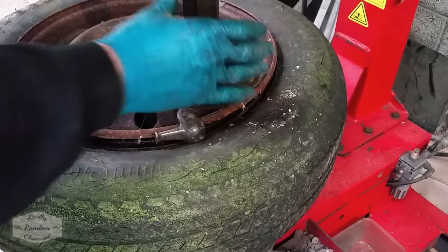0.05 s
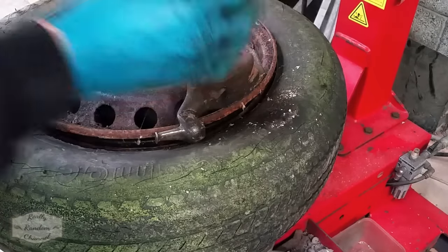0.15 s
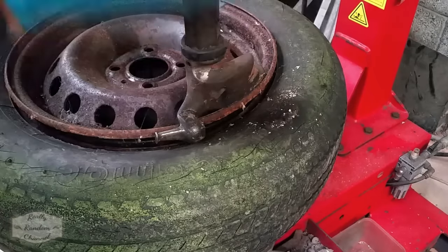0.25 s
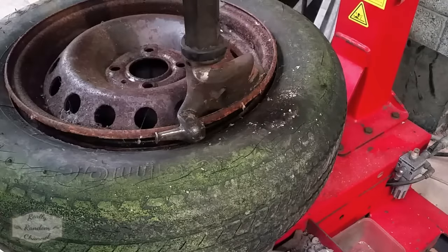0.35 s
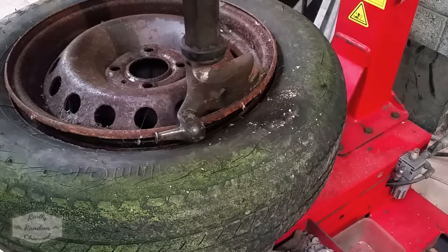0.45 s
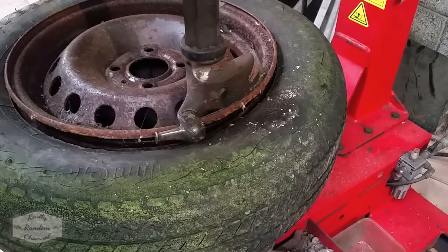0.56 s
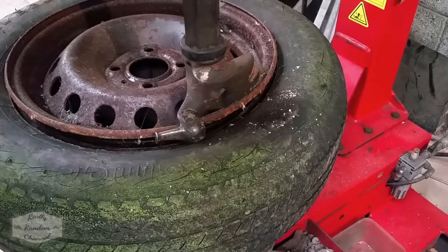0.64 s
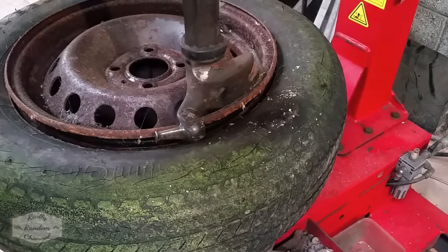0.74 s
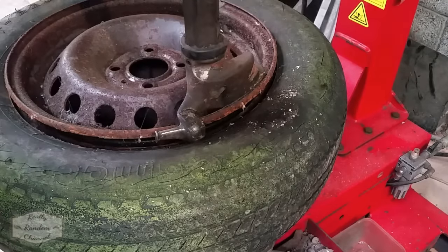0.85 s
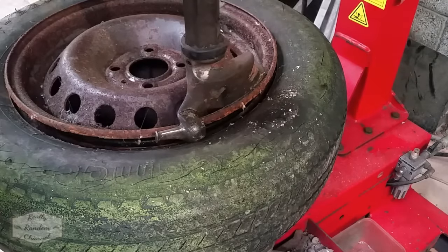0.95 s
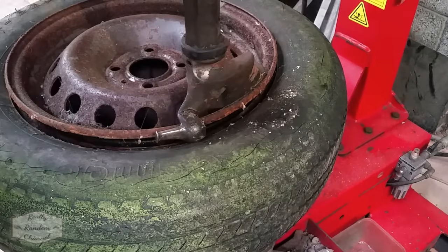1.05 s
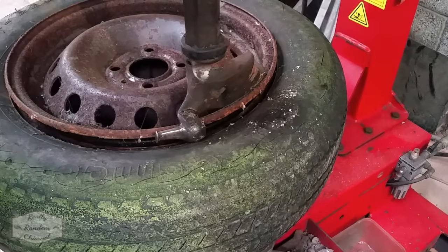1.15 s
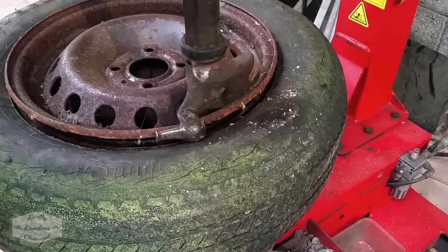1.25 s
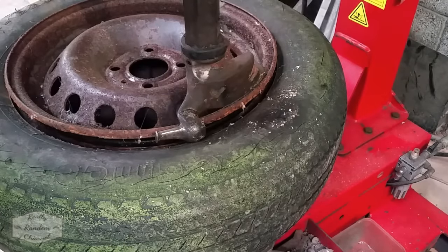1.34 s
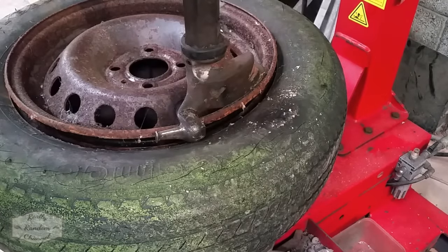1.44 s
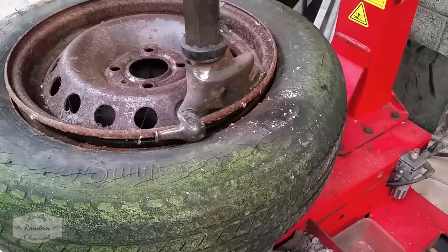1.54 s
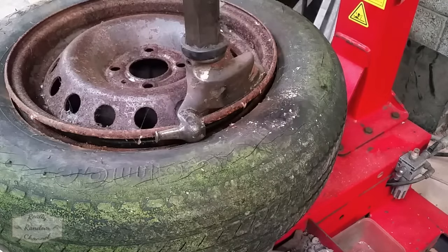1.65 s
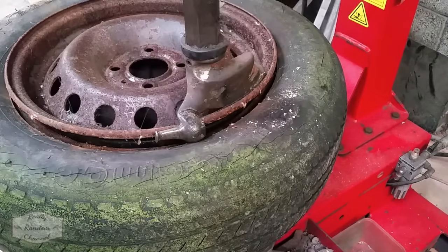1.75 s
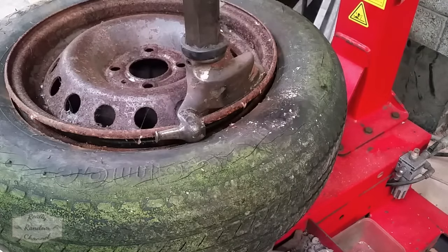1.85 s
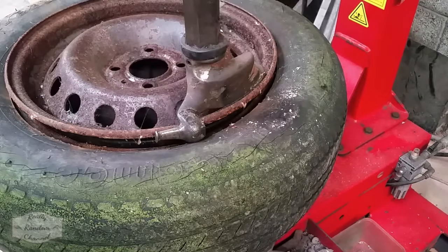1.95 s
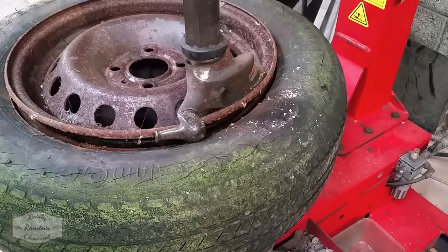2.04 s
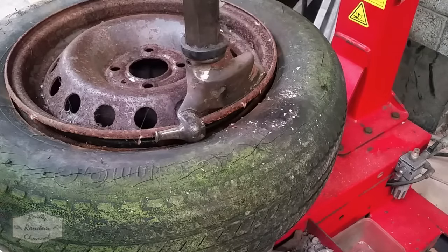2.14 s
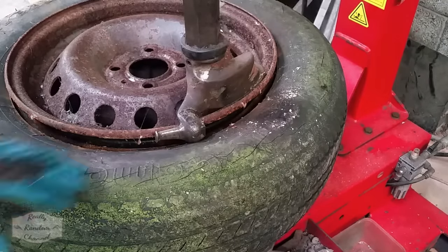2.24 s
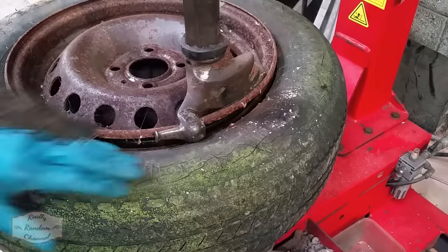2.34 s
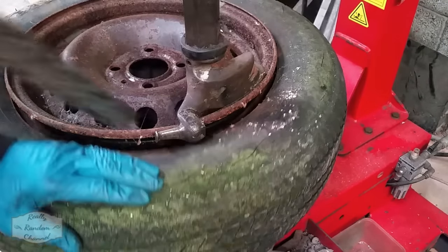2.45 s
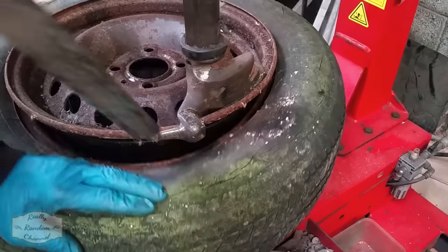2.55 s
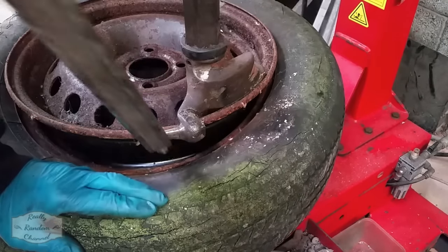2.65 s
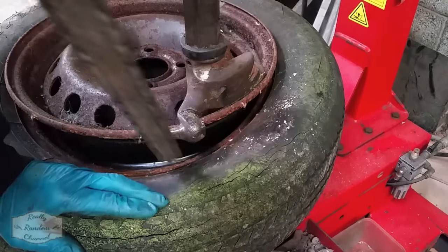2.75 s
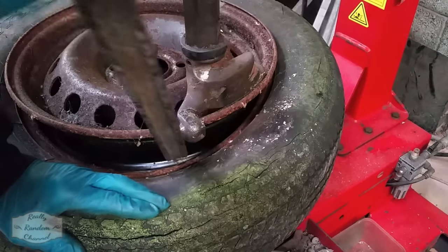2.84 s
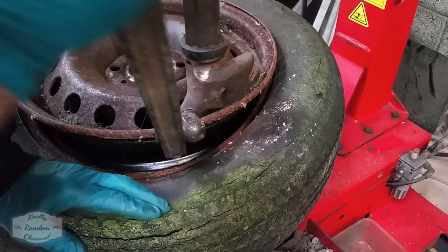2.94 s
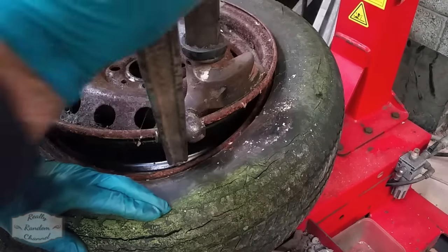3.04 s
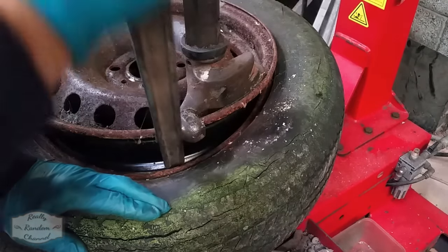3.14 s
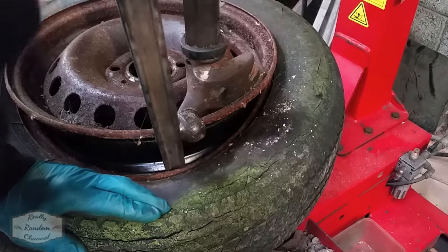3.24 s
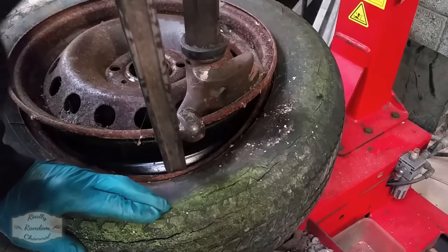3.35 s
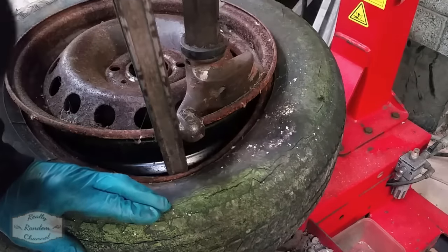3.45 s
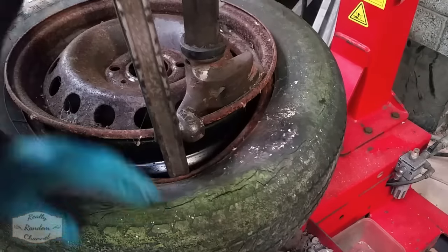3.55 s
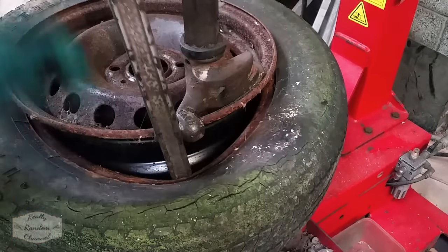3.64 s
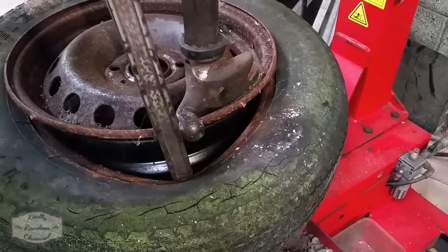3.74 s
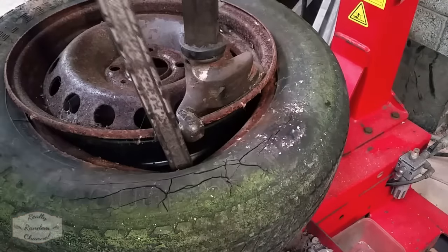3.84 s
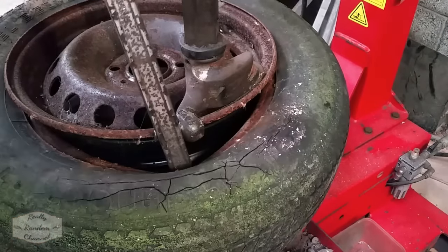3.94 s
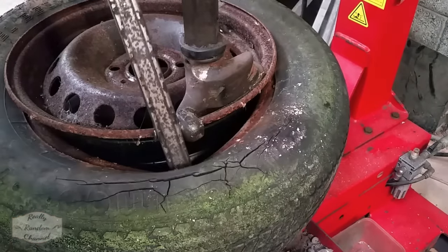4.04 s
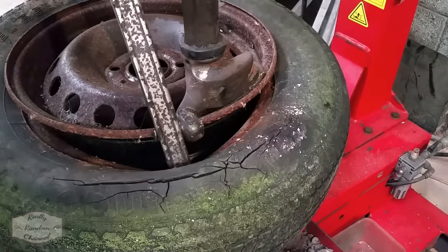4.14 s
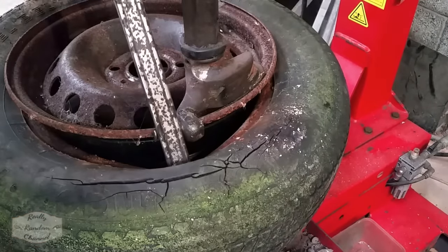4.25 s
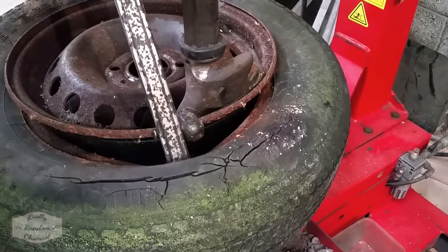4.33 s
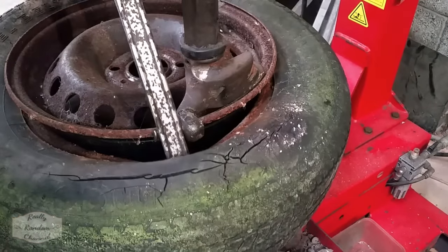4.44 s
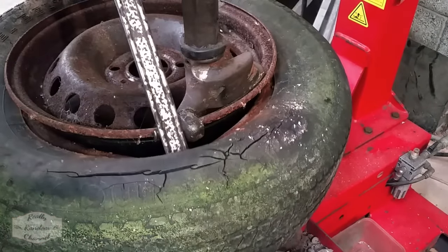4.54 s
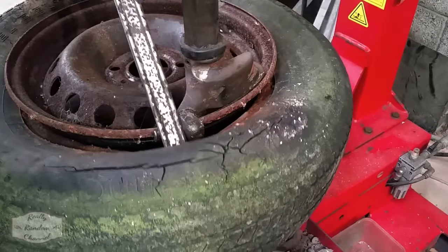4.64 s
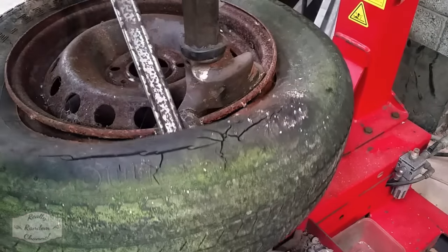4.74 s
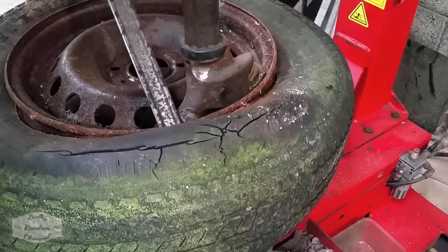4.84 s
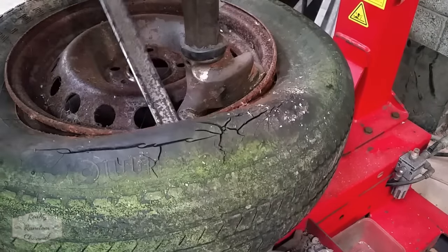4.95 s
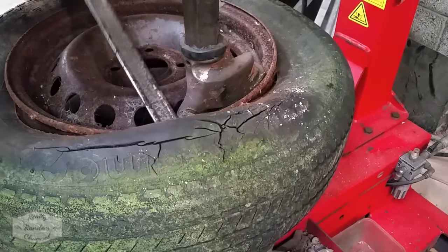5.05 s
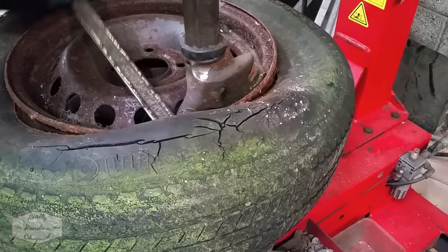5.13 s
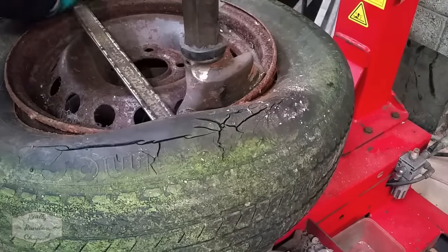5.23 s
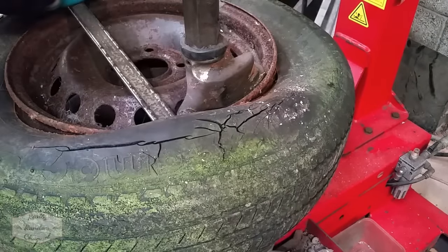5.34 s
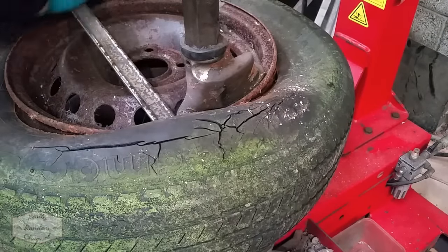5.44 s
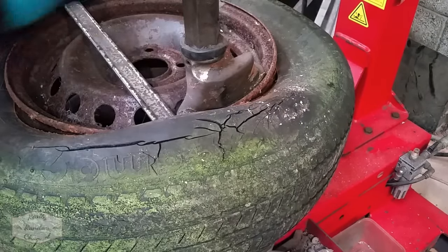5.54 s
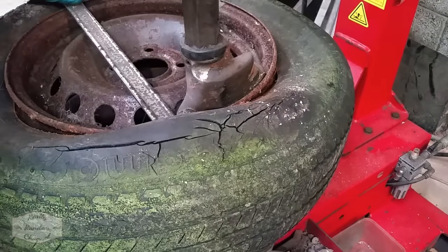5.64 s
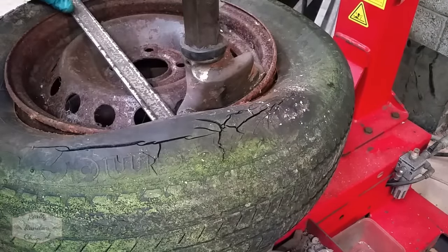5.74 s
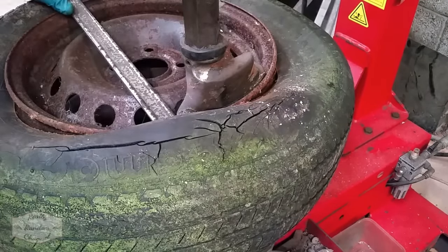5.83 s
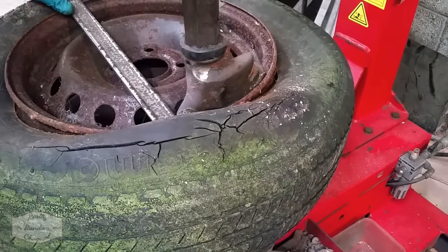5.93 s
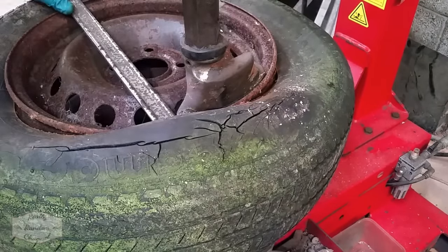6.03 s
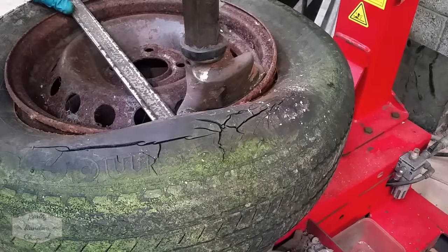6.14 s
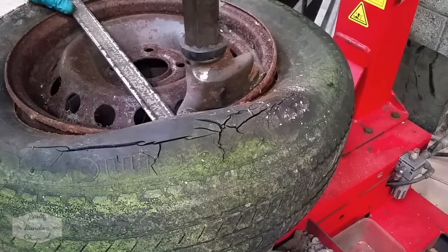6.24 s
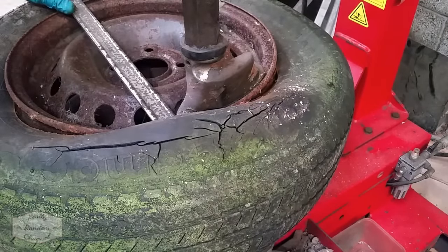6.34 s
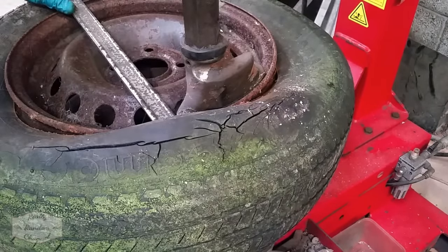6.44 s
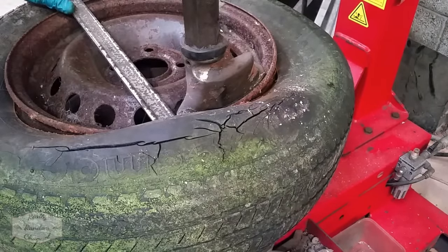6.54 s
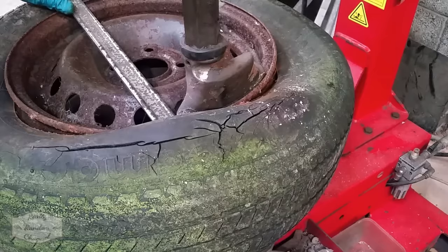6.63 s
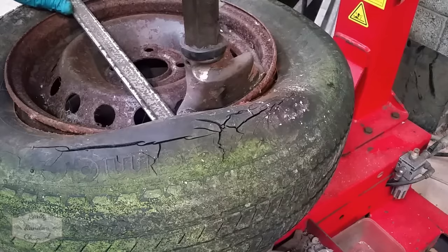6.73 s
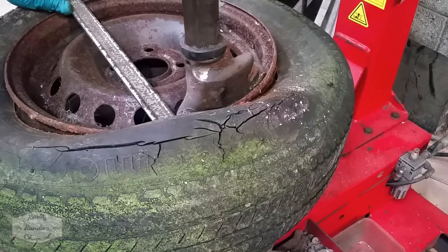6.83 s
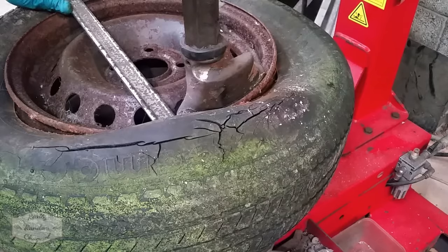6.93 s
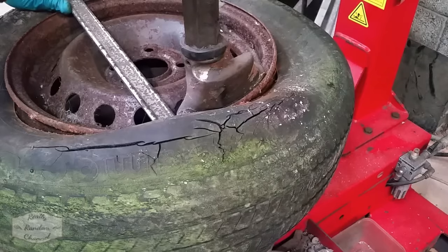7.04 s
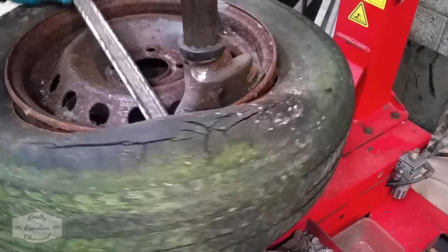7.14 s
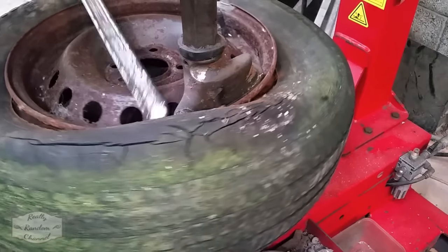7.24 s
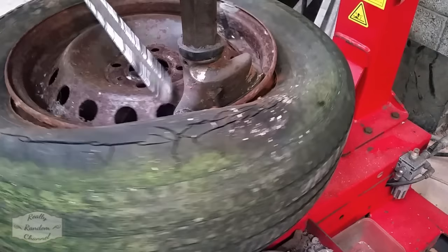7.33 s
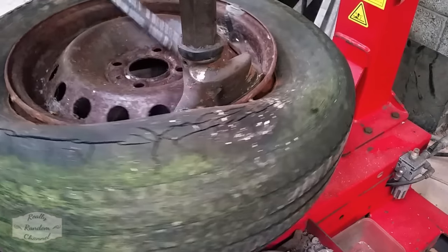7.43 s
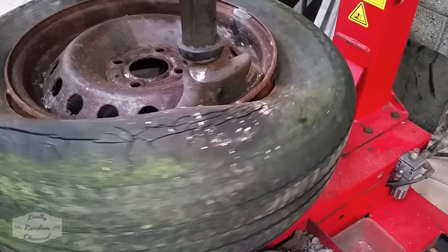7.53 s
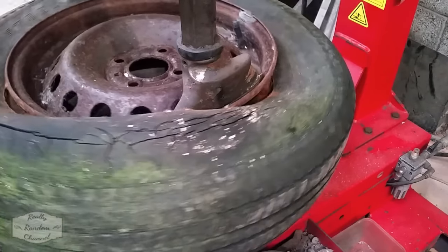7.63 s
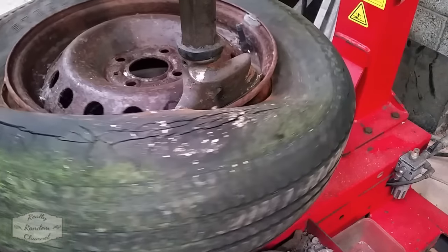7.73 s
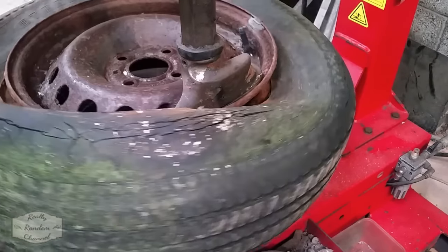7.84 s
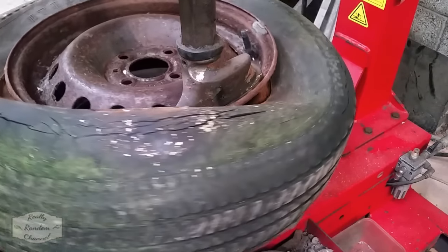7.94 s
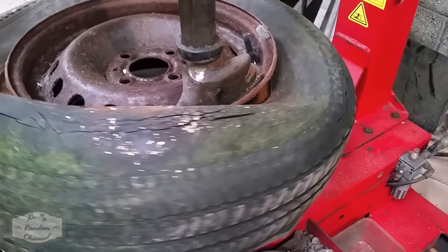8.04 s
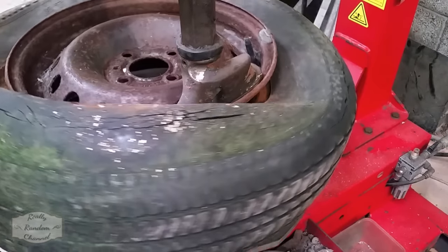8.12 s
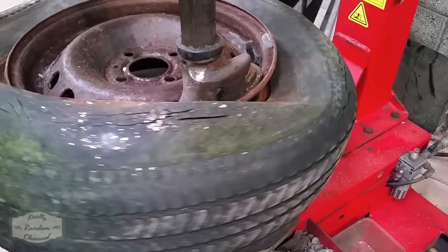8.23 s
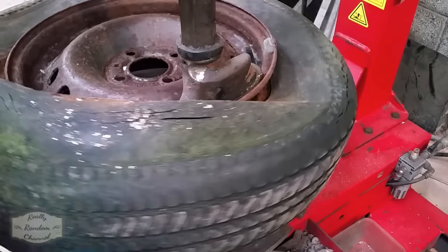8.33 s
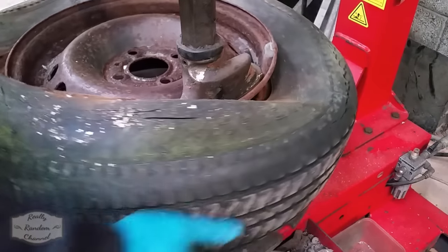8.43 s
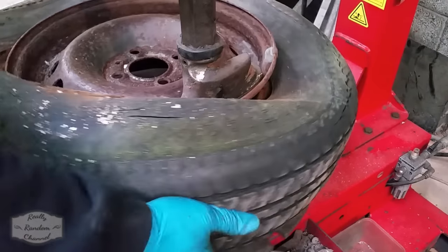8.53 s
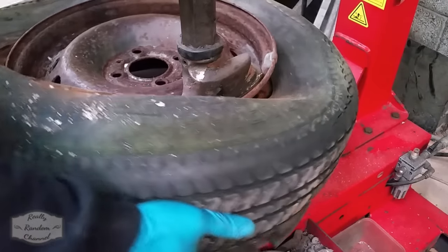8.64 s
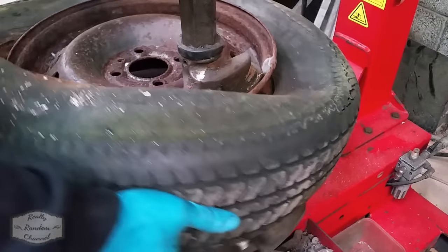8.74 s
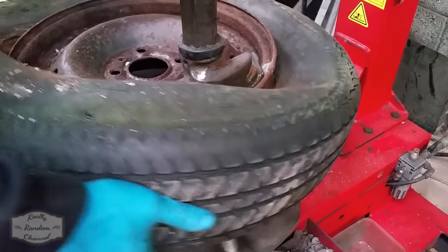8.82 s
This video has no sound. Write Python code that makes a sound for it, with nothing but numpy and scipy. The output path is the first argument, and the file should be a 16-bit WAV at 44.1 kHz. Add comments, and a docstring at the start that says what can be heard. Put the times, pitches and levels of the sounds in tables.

```python
"""In a small workshop a steel lever is pushed under a tyre bead and heaved over a rusty rim.
Over a quiet rumble the rubber groans on resonances shaken by random slips and grains of noise scrape and hiss;
low decaying swings thump and noise bursts knock like steel. Then the turntable motor starts as wavering tones,
the lever springs free and clanks in bending modes, and the bead pops over the rim with a tick of noise.
A near, almost mono microphone pair hears it, with sparse reflections from the room."""
import sys
import numpy as np
from scipy import signal
from scipy.fft import rfft, irfft
from scipy.io import wavfile
from scipy.ndimage import uniform_filter1d

SR = 44100
rng = np.random.default_rng(int(sys.argv[2]) if len(sys.argv) > 2 else 0)


def wav_record(signal):
    """Record a signal, one row per channel, as 16-bit PCM in the file named by sys.argv[1]."""
    frames = np.transpose(np.atleast_2d(signal))
    bounded = np.clip(frames, -1, 1)
    # unit amplitude maps onto the largest positive 16-bit level
    quanta = np.round(bounded * 32767).astype(np.int16)
    wavfile.write(sys.argv[1], SR, quanta)


def gain_from_db(level_db):
    """Convert decibel levels to linear amplitude factors (20 dB per decade)."""
    decades = np.asarray(level_db, float) / 20
    return 10 ** decades


N = 391608  # length in samples

# Spectrum of fine rubber hiss and of the knocks' treble snap. Each row: frequency in Hz, relative level in dB per Hz.
HISS_SPECTRUM = [(4120, -41), (7000, -7), (7710, -16), (8150, -17), (9590, -5.5), (11500, 5), (14900, 2),
                 (16000, -9.5)]
GRIT_PER_S, GRIT_SPREAD_DB = 2500, 4.5  # rust grains


def evened(x):
    """Scales to rms 1."""
    return x / np.sqrt(np.mean(x ** 2) + 1e-20)


def read(points, hz):
    """Reads a spectrum table on a log-frequency axis."""
    f, value = np.transpose(points)
    return np.interp(np.log(hz + 1), np.log(f + 1), value)


def curve(rows, axis=1):
    """One column of a control table at every sample."""
    rows = np.vstack(rows)
    return np.interp(np.arange(N) / SR, rows[:, 0], rows[:, axis])


def add(mix, s, sound):
    """Mixes a sound in at s seconds."""
    part = mix[round(s * SR):][:len(sound)]
    part += sound[:len(part)]


def colour(x, points, power=1):
    """Filters by a dB spectrum, its dB values scaled by power."""
    gain_db = power * read(points, np.fft.rfftfreq(len(x), 1 / SR))
    return irfft(rfft(x) * gain_from_db(gain_db), len(x))


def resonate(x, hz, width):
    """A two-pole resonance of gain about 1 at its centre."""
    pole = np.exp((2j * np.pi * hz - np.pi * abs(width)) / SR)
    return 2 * signal.lfilter([1 - abs(pole)], [1, -pole], x + 0j).real


def ringing(x, modes):
    """Steep resonances, each applied twice, together at rms 1."""
    return evened(sum(gain_from_db(db) * resonate(resonate(x, hz, w), hz, w) for hz, w, db in modes))


def crack(noise, hz, share):
    """Noise gathered steeply around one centre; share is the width as a part of the centre."""
    narrowed = resonate(resonate(noise, hz, share * hz), hz, share * hz)
    return evened(resonate(narrowed, hz, 2 * share * hz))


def clicks(per_s, spread_db):
    """Slips at random instants, of random sign and exponentially spread dB size."""
    size = gain_from_db(spread_db * np.minimum(rng.exponential(1, N), 5))
    return size * (rng.random(N) < per_s / SR) * rng.choice([-1, 1], N)


def strokes(peak, rise, hold, db, fall_db_per_s):
    """Summed loudness of strokes that climb to a peak, hold, and fall away."""
    t = np.arange(0, N + 64, 64)[:, None] / SR
    climb_db = 21.5 * np.maximum(peak - t, 0) / np.maximum(rise, .002)  # 21.5 dB in each rise time
    fall_db = fall_db_per_s * np.maximum(t - peak - np.abs(hold), 0)
    loudness = np.linalg.norm(gain_from_db(db - (climb_db + fall_db)), axis=1)
    return np.interp(np.arange(N) / SR, t[:, 0], loudness)


def turning(rows, db):
    """Loudness of a layer that sounds only once the wheel turns."""
    return gain_from_db(db) * (np.arange(N) / SR > rows[0][0])


def air():
    """Quiet, slowly swelling workshop rumble of coloured noise, with a faint steady tone."""
    # Each row: frequency in Hz, relative level in dB per Hz.
    spectrum = [(12, -44), (20, -8), (32, 7), (86, -1), (241, -13.5), (330, -23.5), (520, -26), (873, -38),
                (1120, -53), (2020, -68), (16000, -88.5)]
    # Steady workshop tone. Each row: frequency in Hz, level in dB rms.
    whine = [(522.2, -88)]
    swell_db = 6.8 * evened(uniform_filter1d(rng.standard_normal(N), size=6000))
    t = np.arange(N) / SR
    tone = sum(np.sqrt(2) * gain_from_db(db) * np.sin(2 * np.pi * hz * t) for hz, db in whine)
    return evened(colour(rng.standard_normal(N), spectrum)) * gain_from_db(-68 + swell_db) + tone


def groan():
    """Stick-slip of the bead shakes the carcass, the air in the tyre and the sidewall."""
    # Whole tyre rocking, air in the tyre, sidewall. Each row: frequency in Hz, width of one pass in Hz, level in dB.
    carcass = [(70.5, 140, -12), (92.5, 45, 2.5)]
    cavity = [(142.6, 30, 0)]
    sidewall = [(280, 42, 7.5), (341, 160, -8)]
    # The lever heaves the bead. Each row: peak in seconds, rise in seconds, groan in dB,
    # air cavity share in dB, sidewall share in dB.
    heaves = [(0.0, .01, -41, -3, -10.5), (.246, 0.09, -60, 6, -3), (.54, 0.3, -68.5, -5, -9.5),
              (.62, 0.047, -49, 3, -2), (.75, 0.14, -52, -2, -8.5), (.87, .1, -47.5, -5.5, -18),
              (1.72, 0.18, -72, -8, -16), (2.12, 0.31, -67, -14, -18), (2.32, .08, -75, -29, -4.5),
              (2.43, .05, -69, 6, -26), (2.532, 0.075, -54.5, -10.5, -13), (2.94, 0.042, -62, 5, 1),
              (3.06, 0.031, -42, -18, -17.5), (3.139, 0.09, -43.5, 4, 3.5), (3.284, .09, -54, 1, -13),
              (3.571, 0.9, -51, -7, -8.5), (3.85, 0.13, -43, 0, -1.5), (4.12, 0.23, -48.5, -3, -6),
              (4.246, 0.048, -46.5, -12, -2.5), (4.434, 0.43, -46.5, -22, -10),
              (4.562, 0.11, -28.5, -15, -4), (4.699, 0.2, -32.5, -12, -4), (4.78, .05, -46, 8, 0),
              (5.188, 0.19, -43, -2, -7.5), (5.429, 0.17, -53.5, -2, -9), (5.55, 0.064, -54, -9, -8),
              (6.55, 0.12, -69.5, -16, -7), (7.01, .1, -63, -2.5, -1.5)]
    # The bead drags while the wheel turns. Each row: time in seconds, groan in dB,
    # air cavity share in dB, sidewall share in dB.
    turn_groan = [(7.045, -60, -1, -2), (7.07, -37, -3, 5), (7.12, -28.5, -30, -7.5),
                  (7.19, -33.5, -1, -5.5), (7.25, -47, 15, 15), (7.36, -52.5, 21, 1.5),
                  (7.466, -30.5, 6.5, -21.5), (7.57, -43.5, 14.5, -8.5), (7.68, -41.5, 8, -13),
                  (7.9, -45, -5, -10.5), (8.22, -42, 2.5, -11), (8.31, -37.5, -1.5, -5.5),
                  (8.45, -38, 3, -9), (8.58, -44.5, -1, 5.5), (8.74, -32.5, 10, -0.5), (8.783, -35, -9, 1),
                  (8.8, -22.5, 1, 11), (8.83, -32, 5, 6), (8.855, -47, 11, 4.5), (8.88, -57, -3, 6.5)]
    # Level at rest in dB of carcass, cavity and sidewall.
    creep_db = (-82, -85, -93.5)
    slips, out = clicks(per_s=300, spread_db=-0.5), np.zeros(N)
    peak, rise, db, cavity_db, side_db = np.transpose(heaves)
    hold_s, fall_db_per_s = 0.005, 128.5
    for k, (modes, share_db) in enumerate([(carcass, 0), (cavity, cavity_db), (sidewall, side_db)]):
        heave = strokes(peak, rise, hold_s, db + share_db, fall_db_per_s)
        turn_share_db = curve(turn_groan, axis=k + 1) if k else 0
        turn = turning(turn_groan, curve(turn_groan) + turn_share_db)
        out += ringing(slips, modes) * (np.hypot(heave, turn) + gain_from_db(creep_db[k]))
    return out


def rubbing():
    """Rust grains give a coarse scrape with brighter grit, the sliding rubber a fine hiss."""
    # Coarse scrape and bright grit spectra. Each row: frequency in Hz, relative level in dB per Hz.
    scrape_spectrum = [(210, -33), (350, -3), (549, -3), (595, -4.5), (639, -5), (718, 0), (772, -6.5),
                       (2210, -17), (3000, -30.5), (3900, -62.5), (6600, -120)]
    grit_spectrum = [(1060, -14), (1800, -7), (2140, -7), (3190, -5), (3630, -6.5), (5040, -12.5),
                     (6740, -24), (8080, -32.5), (9000, -39), (11700, -70.5), (19800, -120)]
    # Steel over rust. Each row: peak, rise and hold in seconds, scrape in dB, bright grit share in dB.
    scrapes = [(0.0, .01, 0.0029, -51.5, -16), (.056, .03, .01, -71, -37), (.448, 0.024, 0.0058, -79, -12),
               (0.585, 0.0083, 0.0064, -48.5, -16.5), (0.608, 0.0051, 0.058, -46.5, 6.5),
               (0.722, .02, 0.013, -48.5, -0.5), (0.801, 0.042, 0.083, -58.5, 6.5),
               (0.98, 0.056, 0.015, -58, -46), (2.93, .015, 0.12, -64.5, 0.5),
               (3.213, 0.03, 0.0072, -39.5, -12.5), (3.453, 0.24, 0.033, -50, -16.5),
               (3.66, 0.21, 0.073, -67.5, -15.5), (3.81, 0.039, .01, -47, -15),
               (4.118, 0.4, 0.007, -61.5, -9.5), (4.283, 0.23, 0.17, -67, -19.5),
               (4.553, .008, .01, -52.5, -24), (4.741, 0.29, 0.0082, -49.5, -17.5),
               (4.838, 0.075, 0.0025, -51.5, -18), (5.016, .1, 0.26, -66.5, -13),
               (5.29, 0.18, 0.23, -68.5, -23), (5.678, .06, .02, -69.5, -14.5),
               (6.995, .02, 0.024, -72.5, -25)]
    # Rubber slides. Each row: peak, rise and hold in seconds, level in dB.
    slides = [(0.0, .01, 0.0028, -65.5), (0.062, .03, 0.15, -85), (.586, .006, 0.0092, -80.5),
              (0.624, 0.016, 0.041, -58), (.662, .01, 0.0016, -44.5), (0.803, 0.0504, 0.22, -82),
              (1.698, 0.035, .02, -80), (2.014, 0.033, .002, -85), (2.094, .05, 0.0021, -77.5),
              (2.964, 0.073, .01, -74), (3.23, .03, 0.074, -72), (3.459, .02, 0.0016, -65.5),
              (3.544, 0.055, .002, -67), (3.812, .03, 0.044, -73), (3.876, .01, 0.0078, -64.5),
              (4.133, 0.17, 0.0025, -67.5), (4.598, 0.059, 0.19, -74), (4.754, .05, .002, -75.5),
              (4.842, .05, .002, -74), (4.894, .03, .002, -73.5), (5.008, .03, 0.061, -80),
              (5.329, .07, 0.014, -54), (5.418, 0.073, 0.017, -56.5), (5.448, 0.01, 0.0017, -55),
              (5.651, 0.042, .002, -78.5), (5.704, .03, 0.0014, -75.5), (8.748, 0.0027, .002, -54)]
    # While the wheel turns. Each row: time in seconds, scrape in dB, bright grit share in dB, fine hiss in dB.
    turn_rub = [(7.045, -73, -13, -84.5), (7.062, -43.5, -12.5, -50.5), (7.14, -52, -4.5, -56.5),
                (7.159, -39, 5, -55), (7.18, -44, -1, -49.5), (7.235, -38.5, -6.5, -51),
                (7.26, -35.5, 1.5, -48.5), (7.296, -36.5, -12, -52), (7.312, -37, -25, -62.5),
                (7.56, -45, 1, -60), (7.66, -47.5, 3.5, -57.5), (7.78, -45, -6.5, -60.5),
                (7.93, -54.5, -11, -77.5), (8.13, -50.5, -20.5, -76), (8.5, -41.5, -18, -61.5),
                (8.56, -42.5, -13, -56.5), (8.75, -38.5, -12.5, -52.5), (8.78, -42, -11, -54.5),
                (8.82, -34, -12.5, -41.5), (8.88, -37, -15, -52)]
    grains = evened(clicks(GRIT_PER_S, GRIT_SPREAD_DB)) + 2.0 * rng.standard_normal(N)
    flutter_db = 1.2 * evened(uniform_filter1d(rng.standard_normal(N), size=500))

    peak, rise, hold, db, grit_db = np.transpose(scrapes)
    scrape_fall = 102  # dB per second
    coarse = strokes(peak, rise, hold, db, scrape_fall) + turning(turn_rub, curve(turn_rub))
    bright = strokes(peak, rise, hold, db + grit_db, scrape_fall)
    bright += turning(turn_rub, curve(turn_rub) + curve(turn_rub, axis=2))

    peak, rise, hold, db = np.transpose(slides)
    fine = strokes(peak, rise, hold, db, 404) + turning(turn_rub, curve(turn_rub, axis=3))
    fine += strokes(peak, rise, hold, db - 15.5, 85)  # weaker, slower tail

    fizz = 1.1 * evened(clicks(per_s=1800, spread_db=1.5)) + rng.standard_normal(N)
    scrape = evened(colour(grains, scrape_spectrum)) * coarse + evened(colour(grains, grit_spectrum)) * bright
    hiss = evened(colour(fizz, HISS_SPECTRUM)) * fine
    return scrape * gain_from_db(flutter_db) + hiss * gain_from_db(1.6 * flutter_db)


def rim(x):
    """Whatever touches the wheel sets its damped modes ringing."""
    # Clamped steel wheel. Each row: frequency in Hz, width in Hz before narrowing to 0.35 of it, level in dB.
    modes = [(836, 15, 6), (1600, 84, -6), (1744, 22, -6), (1840, 21, -1), (2120, 8.7, -10),
             (2514, 45, 0.5), (3260, 190, 0), (3670, 100, -6), (4100, 110, -1.5), (4970, 100, -12),
             (5640, 59, -19.5), (6350, 39, -25.5)]
    return sum(gain_from_db(db) * resonate(x, hz, 0.35 * width) for hz, width, db in modes)


def faint():
    """A far rumble of coloured noise sets in and stays; short bands of noise tick."""
    # Distant rumble. Each row: frequency in Hz, relative level in dB per Hz.
    far_spectrum = [(180, -32.5), (300, -1), (460, -11), (507, -6.5), (686, 1), (907, -2.5), (1600, -31.5),
                    (2080, -64), (3520, -120)]
    # Its one stroke: peak, rise (2 ms at least) and hold in seconds, level in dB.
    far_stroke = (0.5, -11.9, 8.6, -82.5)
    # Faint ticks. Each row: start in seconds, level in dB, t60 in seconds.
    ticks = [(1.665, -77, .012), (1.785, -77, .04), (1.915, -84, .015), (1.955, -86, 0.011),
             (2.005, -78, 0.044), (2.089, -73.5, .012)]
    out = evened(colour(rng.standard_normal(N), far_spectrum)) * strokes(*far_stroke, 60)
    t = np.arange(3000) / SR
    for (s, db, t60), noise in zip(ticks, rng.standard_normal((len(ticks), len(t)))):
        add(out, s, gain_from_db(db - 60 * t / t60) * crack(noise, 2300, .55))
    return out


def thumps():
    """Each jolt is a short low swing with a weaker upper sidewall mode."""
    # Tyre jolts. Each row: start in seconds, level in dB, frequency in Hz, t60 in seconds (0.02 at least).
    jolts = [(0.605, -37, 133, 0.26), (0.719, -26, 125, 0.079), (0.799, -40.5, 193.7, 0.22),
             (0.989, -45, 364, 0.13), (0.995, -42, 168, 0.1), (2.417, -45.5, 117, 0.065),
             (2.511, -45, 92, 0.081), (2.934, -44, 202, 0.067), (3.036, -23.5, 118, 0.1),
             (3.105, -21, 103, 0.11), (3.143, -12, 327, 0.052), (3.537, -37.5, 115.6, 0.12),
             (3.819, -26.5, 160.7, 0.21), (4, -39.5, 104, 0.093), (4.08, -40, 280, 0.26),
             (4.247, -31.5, 159, 0.11), (4.363, -31, 90, 0.07), (4.554, -22.5, 282.5, 0.14),
             (4.556, -20.5, 127, 0.083), (4.629, -20.5, 87.4, 0.18), (4.689, -23.5, 89, 0.11),
             (4.769, -23.5, 135, 0.087), (5.169, -20, 98, 0.049), (5.498, -38.5, 146.5, 0.12),
             (7.081, -21, 261, 0.12), (7.245, -6.5, 149.3, 0.2), (7.38, -19.5, 156, 0.14),
             (7.418, -14, 155, 0.072), (7.489, -14, 146, 0.052), (7.611, -19.5, 135, 0.06),
             (7.652, -12, 163.5, 0.084), (7.719, -19.5, 138, 0.15), (8.7857, -1.5, 111, 0.073),
             (8.858, -9.5, 164, 0.09)]
    out, t = np.zeros(N), np.arange(SR // 2) / SR
    for s, db, hz, t60 in jolts:
        upper = 0.53 * np.sin(2 * np.pi * 1.7 * hz * t) * gain_from_db(-30 * t / t60)
        swing = np.sin(2 * np.pi * hz * t) + upper
        onset = 1 - np.exp(-t / 0.0022)
        add(out, s, gain_from_db(db - 60 * t / max(t60, .02)) * onset * swing)
    return out


def knocks():
    """Steel on rust: a noisy crack with a duller undertone, a brighter first instant and a treble snap."""
    # Each row: start in seconds, level in dB, crack centre in Hz, t60 in seconds (0.01 at least),
    # treble snap in dB against the knock.
    hits = [(0.612, -17, 1830, 0.01, -22.5), (0.6633, -25, 1970, 0.024, -26),
            (0.7221, -37.5, 806, 0.057, -23), (0.9927, -36, 1600, 0.084, -36),
            (3.1393, -23, 1860, 0.06, -54.5), (3.2071, -27.5, 2480, 0.069, -50),
            (3.4617, -49, 1090, 0.073, -13), (3.8723, -54.5, 2700, 0.18, -20),
            (4.1594, -69, 1160, 0.098, -2), (4.555, -60.5, 893, 0.09, -26), (4.616, -47, 1060, 0.063, -22),
            (4.6866, -54, 1290, 0.12, -22), (4.8344, -44, 1370, 0.054, -28),
            (4.9003, -54.5, 2400, 0.063, -16), (5.125, -62, 2670, 0.061, -11),
            (5.1625, -48.5, 1040, 0.031, -28), (5.4581, -49.5, 3850, 0.019, 9.5),
            (7.1541, -28.5, 1346, 0.049, -21), (7.2429, -19, 1610, 0.059, -15),
            (7.6594, -39.5, 1520, 0.078, -4), (7.7394, -41.5, 1454, 0.097, -21),
            (8.175, -54.5, 1270, 0.055, -22), (8.7855, -18.5, 1206, 0.076, -8)]
    out, t = np.zeros(N), np.arange(SR // 3) / SR
    for (s, db, hz, t60, snap_db), noise in zip(hits, rng.standard_normal((len(hits), len(t)))):
        share = max(0.33 + 0.0351 * (db + 38.5), .2)  # harder knocks sound broader
        body = gain_from_db(-60 * t / max(t60, .01)) * (crack(noise, hz, share) + 0.58 * crack(noise, 0.44 * hz, 0.41))
        edge = 0.5 * gain_from_db(-60 * t / 0.0073) * crack(noise, 1.6 * hz, 0.53)
        snap = gain_from_db(snap_db - 60 * t / 0.037) * evened(colour(noise, HISS_SPECTRUM))
        onset = 1 - np.exp(-t / 0.00055)
        add(out, s, gain_from_db(db) * onset * (body + edge + snap))
    return out


def scuffing():
    """Something scuffs lightly over the rim: bright grains without any body."""
    # Each row: frequency in Hz, relative level in dB per Hz.
    spectrum = [(1200, -42), (2200, -3.5), (3500, -1.5), (4600, 0), (6500, -10), (8000, -22.5),
                (16000, -59)]
    # Each row: peak, rise and hold in seconds, level in dB.
    scuffs = [(.63, .02, 0.13, -58), (3.17, 0.019, 0.035, -61), (2.948, 0.018, 0.16, -91),
              (5.307, 0.057, 0.029, -61), (5.43, .04, 0.033, -66)]
    grains = evened(clicks(GRIT_PER_S, GRIT_SPREAD_DB)) + rng.standard_normal(N)
    return evened(colour(grains, spectrum)) * strokes(*np.transpose(scuffs), 218.5)


def motor():
    """Magnetic hum near multiples of twice the mains frequency and gear tones, each wavering a little."""
    # Motor and gearbox tones. Each row: frequency in Hz, level in dB before load and waver.
    tones = [(100.2, -44.5), (156.1, -62), (200.3, -36.5), (300.5, -49.5), (400.6, -69), (500.6, -68.5),
             (601, -48.5), (712, -51.5), (805, -59.5), (931.3, -62)]
    # Each row: time in seconds, motor load in dB; the first time is the start.
    load = [(7.045, -28.5), (7.07, -3.5), (7.6, -5), (8.0, -8), (8.3, 0), (8.75, 6.5), (8.88, 7.5)]
    t, out = np.arange(N) / SR, np.zeros(N)
    for hz, db in tones:
        smooth = uniform_filter1d(uniform_filter1d(rng.standard_normal((2, N)), size=2500), size=2500)
        level_waver, phase_waver = evened(smooth)
        tone = np.sin(2 * np.pi * hz * t + .55 * phase_waver)
        out += np.sqrt(2) * gain_from_db(db + 2.4 * level_waver) * tone
    return out * gain_from_db(curve(load)) * (t > load[0][0])


def clanks():
    """Bending modes of the lever; where it is struck decides which answer, and the next contact damps the ring."""
    # Bending mode frequencies in Hz.
    mode_hz = [701, 1357, 1619, 1806, 2288, 2398, 2785, 2918, 3071, 3229, 3320, 3668, 3838, 4388, 4571,
               5452, 5583, 5889, 6118, 6238, 6923, 7229, 7495, 8319, 9482, 9915, 11174, 11608, 11915, 13115,
               13292, 13867]
    # One row for each mode: level in dB, t60 in seconds before a stretch of 1.1.
    mode_decay = [(-14.5, .49), (-19.5, 1), (2.5, 0.25), (-12.5, .37), (-10.5, 0.23), (-3, .27),
                  (-13, 0.11), (0.5, 0.33), (-15, 0.28), (-8.5, 0.2), (-4.5, 0.48), (-17.5, 0.21),
                  (-18.5, 0.69), (-6, 0.34), (-7.5, 0.82), (-12, 0.36), (-10.5, 0.54), (-11.5, 0.67),
                  (-5.5, 0.27), (-20, .39), (-17, .45), (-17.5, .44), (-20.5, 0.26), (-12, 0.3),
                  (-17, 0.38), (-21, 0.37), (-21, .54), (-32, 0.45), (-15.5, .48), (-21, .41), (-25.5, .4),
                  (-20, .39)]
    # Crowd of weak lever modes. Each row: frequency in Hz, relative level in dB per Hz.
    shimmer_spectrum = [(1100, -29.5), (2000, -10.5), (3010, -5.5), (4140, -14.5), (4550, 3), (4950, -17),
                        (5690, -4.5), (8870, -20), (11500, -10), (15500, -27), (16000, -51)]
    # The loose lever. Each row: start in seconds, ring in dB, contact point from 0 to 1, crack in dB,
    # crack centre in Hz, shimmer in dB.
    strikes = [(7.246, -50.5, .2, -38, 2930, -38.5), (7.3267, -17.5, 0, -15.5, 3335, -18.5),
               (7.473, -31, 0, -12.5, 3536, -30)]
    out, t = np.zeros(N), np.arange(SR * 3 // 4) / SR
    hz, (mode_db, t60) = np.c_[mode_hz], np.transpose(mode_decay)[:, :, None]
    radiated_db = mode_db + 1.1 * np.log2(np.minimum(hz / 3300, 1))  # a thin bar radiates low modes poorly
    fade = gain_from_db(-60 * t / (1.1 * t60)) + 0.57 * gain_from_db(-60 * t / 0.09)  # a quick early drop, then each mode's longer ring
    ends = [row[0] for row in strikes[1:]] + [N / SR]
    for row, end in zip(strikes, ends):
        s, db, place, crack_db, crack_hz, shimmer_db = row
        noise = rng.standard_normal((len(mode_hz) + 1, len(t)))
        shape = np.cos(np.pi * place * np.sqrt(hz / 100))
        rattle = 1 + .55 * evened(uniform_filter1d(uniform_filter1d(noise[1:], size=500), size=500))
        modes = shape * gain_from_db(radiated_db) * fade * rattle * np.sin(2 * np.pi * hz * t)
        damped = np.where(t < end - s, 1, .45)
        shimmer = gain_from_db(shimmer_db - 60 * t / 0.3) * evened(colour(noise[0], shimmer_spectrum))
        blow = gain_from_db(crack_db - 60 * t / 0.065) * crack(noise[0], crack_hz, 1.0)
        add(out, s, (gain_from_db(db) * modes.sum(0) + shimmer) * damped + blow)
    return out


def bead_pop():
    """The bead snaps free with a tiny tick of treble noise."""
    # Each row: start in seconds, level in dB, t60 in seconds.
    pops = [(8.7862, -10, 0.0022)]
    out, t = np.zeros(N), np.arange(SR // 3) / SR
    for s, db, t60 in pops:
        add(out, s, gain_from_db(db - 60 * t / t60) * evened(colour(rng.standard_normal(len(t)), HISS_SPECTRUM)))
    return out


def room(x):
    """Sparse reflections of random sign, each band dying at its own speed."""
    # Each row: frequency in Hz, t60 in seconds.
    decay = [(100, 0.8), (500, 0.2), (2000, 0.62), (5000, 0.32), (12000, 0.73)]
    taps = np.zeros(SR)
    at = np.arange(300, SR - 20, 20)
    taps[at + rng.integers(0, 20, len(at))] = rng.choice([-1., 1.], len(at))
    hz, t, z = signal.stft(taps, SR, nperseg=256)
    tail = signal.istft(z * gain_from_db(-60 * t / read(decay, hz)[:, None]), SR, nperseg=256)[1]
    return signal.fftconvolve(x, tail / np.linalg.norm(tail))[:N]


def scene():
    """All sources lie close together in front of the microphones."""
    steel, lever, rubber, rub = knocks() + bead_pop(), clanks(), thumps(), rubbing()
    wheel = rim(gain_from_db(6.0) * steel + gain_from_db(-2.5) * rub)
    wet = room(gain_from_db(-8.5) * (steel + wheel) + gain_from_db(-11.0) * lever + gain_from_db(-6.0) * rubber)
    mono = steel + wheel + lever + rubber + wet + groan() + rub + motor() + air() + faint() + scuffing()
    return np.array([mono, mono])


def roll_off(x):
    """The treble ends steeply here."""
    return signal.sosfilt(signal.butter(12, 16630, fs=SR, output="sos"), x)


def record(dry):
    """Microphone noise, bass cut, a housing shading the two ports differently, soft overload, band limit."""
    # Microphone noise. Each row: frequency in Hz, relative level in dB per Hz.
    self_spectrum = [(300, -3), (1200, 0.5), (3000, -3), (9000, -4.5), (12400, 3), (16000, -2.5)]
    # Each row: frequency in Hz, left minus right in dB.
    ports = [(60, 0.0), (99, 0.0), (160, 0.0), (270, 0.0), (450, 0.0), (740, 0.0), (1220, 0.5), (2010, 0.5),
             (3330, 3.5), (5500, 9.5), (9080, 3), (15000, -4.5)]
    dry = dry + gain_from_db(-89) * evened(colour(rng.standard_normal(N), self_spectrum))
    cut = signal.sosfilt(signal.butter(4, 42, "high", fs=SR, output="sos"), dry)
    cut = np.pad(cut, [(0, 0), (2048, 2048)], "reflect")  # keeps the port filters from wrapping round
    left, right = colour(cut[0], ports, .5), colour(cut[1], ports, -.5)
    pair = np.array([left, right])[:, 2048:-2048]
    overloaded = 0.9 * np.tanh(pair / 1.019)
    band_limit = signal.firwin(255, 15950, window=("kaiser", 5), fs=SR)[None]
    return roll_off(signal.oaconvolve(overloaded, band_limit, "same"))


dry = scene()
out = record(dry)
wav_record(out)
```